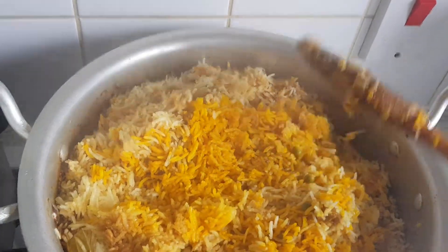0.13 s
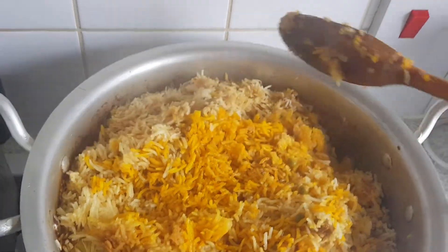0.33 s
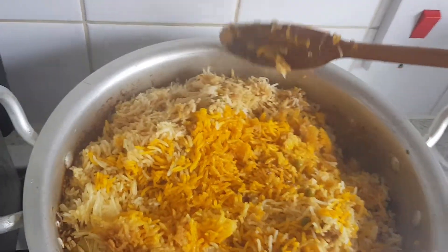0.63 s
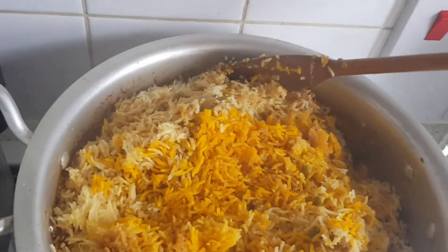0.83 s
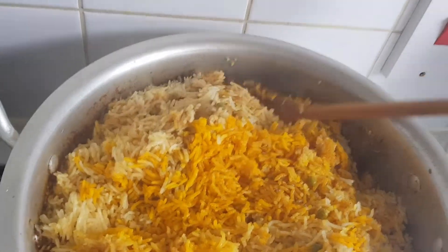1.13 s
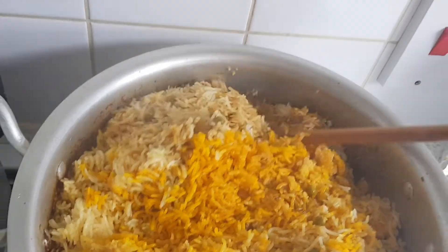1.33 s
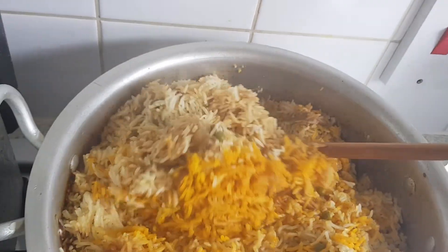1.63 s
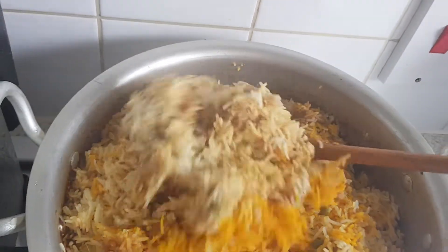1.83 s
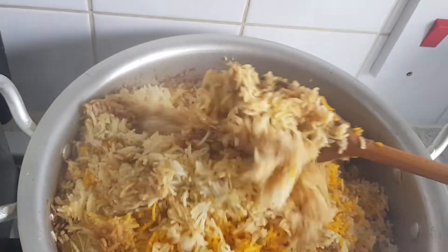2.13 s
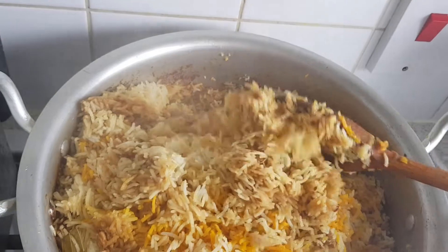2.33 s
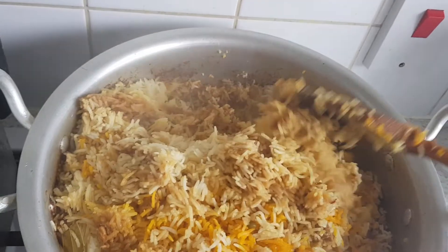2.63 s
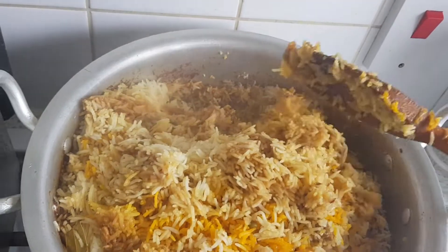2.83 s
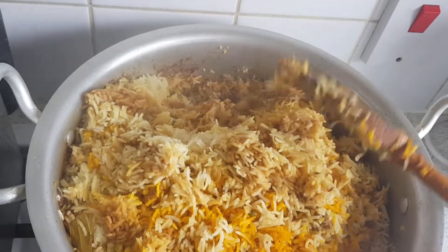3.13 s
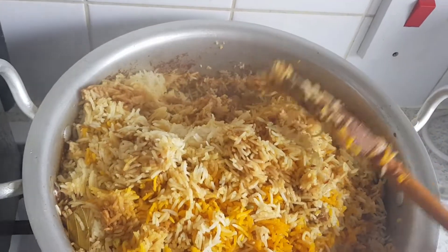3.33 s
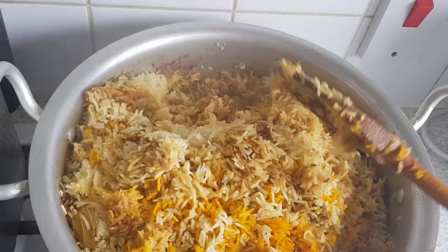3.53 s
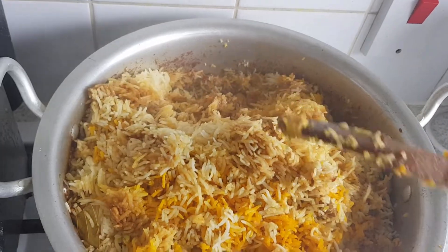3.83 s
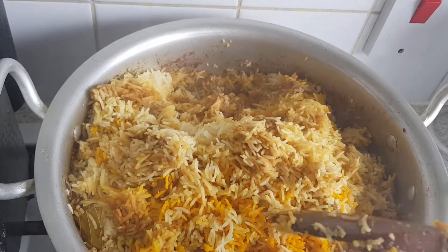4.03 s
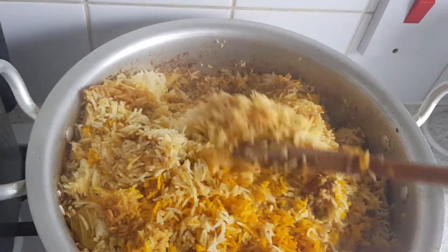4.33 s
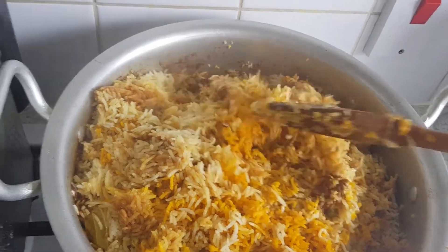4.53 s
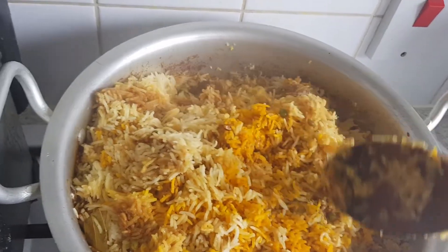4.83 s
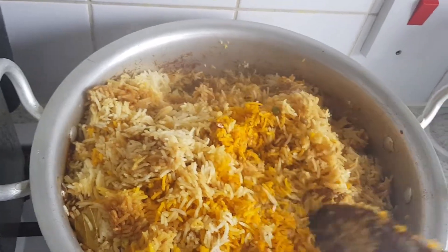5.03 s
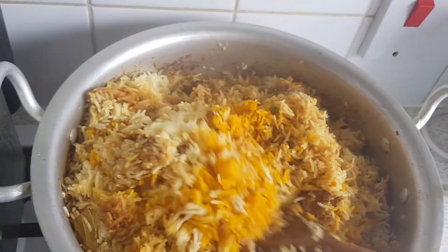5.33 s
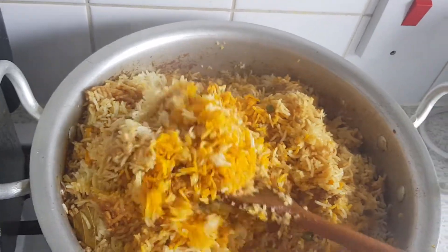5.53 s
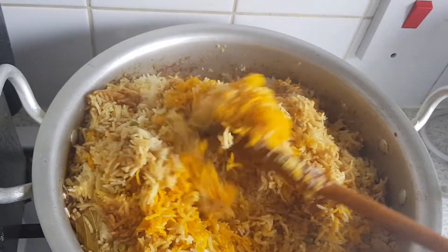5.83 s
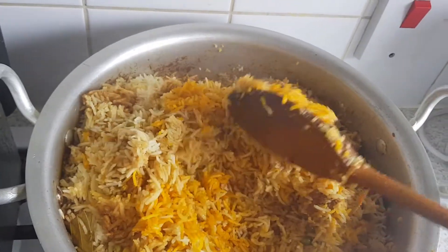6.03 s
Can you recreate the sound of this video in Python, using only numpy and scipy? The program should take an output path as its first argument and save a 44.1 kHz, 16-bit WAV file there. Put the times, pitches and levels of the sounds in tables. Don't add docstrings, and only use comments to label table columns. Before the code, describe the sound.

A phone held close in a small tiled kitchen hears steady soft hiss, swelling low rumble and a faint thin whine. Almost at once, at 0.04 s, a wooden spoon cracks hard on a metal pot rim, a short clanky ring damped by rice, with a late stove thud. After near quiet, from 0.9 to 1.2 s the edge catches, chatters and scrapes down the wall, bright and raspy, then duller, ending in a soft landing. From 1.3 to 2.1 s there are faint low rubs on the bottom; from 1.7 to 3 s, tiny crisp rice ticks, soft lumps dropping around 2.2 to 2.35, and a muffled knock at 2.5. Two rim taps ring at 3.3 and 3.5 s, the second firmer. Only faint grain fizz follows until a dull double bump at 5.0 and a low wall knock at 5.2, then rice ticks and barely audible dry brushes to about 6 s.

```python
import sys
import numpy as np
from scipy import signal
from scipy.fft import rfft, irfft, next_fast_len
from scipy.io import wavfile
from scipy.ndimage import uniform_filter1d

SR = 44100
rng = np.random.default_rng(int(sys.argv[2]) if len(sys.argv) > 2 else 0)


def level_to_linear(level):
    exponent = np.asarray(level, float) / 20
    return 10 ** exponent


def to_wav(s):
    ch = np.atleast_2d(s).T
    pcm = np.round(np.clip(ch, -1, 1) * 32767)
    wavfile.write(sys.argv[1], SR, pcm.astype(np.int16))


N = 273081
FAST = next_fast_len(N)
LEFT_LAG_S = 4.3 / SR

# pitch_hz, level_db, t60_s
GRATE_MODES = [(47, -17, 0.4), (78.2, -8, 0.59), (92.5, -3.5, 0.26), (107.5, 5, 0.12), (128.8, 0, 0.35),
               (151, -15, 0.4)]


def on_log(table, hz):
    f, v = np.transpose(table)
    return np.interp(np.log(np.maximum(hz, 1)), np.log(f), v)


def colour(x, table):
    size = next_fast_len(x.shape[-1])
    gain = level_to_linear(on_log(table, np.fft.rfftfreq(size, 1 / SR)))
    return irfft(rfft(x, size) * gain, size)[..., :x.shape[-1]]


def band(x, low_hz, high_hz):
    return signal.sosfilt(signal.butter(2, [low_hz, high_hz], "band", fs=SR, output="sos"), x)


def unit(x):
    return x / np.sqrt(np.mean(x ** 2))


def curves(table):
    return np.interp(np.arange(N) / SR, *np.transpose(table), -300, -300)


def walk(rate_hz):
    k = int(SR / rate_hz)
    steps = np.repeat(rng.standard_normal(N // k + 1), k)
    return uniform_filter1d(uniform_filter1d(steps, k), k)[:N]


def ring(modes):
    t = np.arange(SR // 3) / SR
    return sum(level_to_linear(db) * np.sin(2 * np.pi * hz * t) * np.exp(-np.log(1000) * t / max(t60_s, 1 / 200))
               for hz, db, t60_s in modes)


def resonate(x, peaks):
    modes = [(hz, db + 10 * np.log10(width_hz), np.log(1000) / (np.pi * width_hz)) for hz, width_hz, db in peaks]
    return unit(signal.fftconvolve(x, ring(modes))[:N])


def add(out, s, x, db):
    i = int(s * SR)
    out[i:i + len(x)] += (x * level_to_linear(db) / np.max(np.abs(x)))[:N - i]


def grains(rate_hz, spread_db):
    biggest_spreads = 3.5
    chance = rng.random((3, N))
    clicks = (chance[0] < rate_hz / SR) * np.sign(chance[1] - .5)
    size_db = spread_db * np.minimum(-np.log(1 - chance[2]), biggest_spreads)
    return unit(clicks * level_to_linear(size_db))


def push(s, length_s, db):
    edge_share = 0.27
    t = np.arange(N) / SR - s
    rise = np.clip(np.minimum(t, length_s - t) / (length_s * edge_share / 2), 0, 1)
    return level_to_linear(db) * rise ** 2, np.clip(t, 0, length_s) - length_s / 2


def blows():
    # spoon_db, crack_db, thud_db
    hard_rim = [
        (.043, -11.5, 0.44, 6.3, -5),
    ]
    rim = [
        (3.321, -23, 2.8, -1.5, 0),
        (3.4725, -18, 3.4, 2.5, 0),
    ]
    wall = [
        (4.977, -24.5, -12.5, -42, -12.5),
        (4.994, -30, -20, -42, -18),
    ]
    low_wall = [
        (5.203, -25.5, 0.81, -8, -8.5),
    ]
    landing = [
        (1.181, -19.5, -14, -6.5, -9.5),
    ]
    catch = [
        (.888, -28, -2, 3.5, -6),
        (.9197, -29.5, -1, -4, -5),
        (.945, -28, -5, -10, -14),
        (.996, -36, 3, 11.5, 4),
        (1.038, -42, 13, 8, -5),
        (1.082, -46, 3, 4, -20),
        (1.137, -44, 0, -9.5, -22),
    ]
    buried = [
        (2.477, -34, -12, -33, -1),
    ]
    # pitch_hz, level_db, t60_s
    hard_rim_modes = [(256, -3, 0.19), (374, -6, 0.14), (472, -5.5, 0.12), (572, -11, 0.16),
                      (669, -3.5, 0.068), (785, -12, 0.091), (844, -1.5, .14), (905, 1, 0.083),
                      (957, 17, 0.023), (966, -7, 0.057), (1088, 4, 0.077), (1143, -11, 0.064),
                      (1342, -12.5, 0.11)]
    rim_modes = [(284, -6.5, 0.12), (338.3, -6.5, 0.22), (435, -13, 0.18), (617, 2, 0.081), (670, 0, 0.11),
                 (716, 6, 0.073), (792, 1, 0.097), (840, 4, 0.15), (908, 20.5, 0.043), (952, 11, 0.029),
                 (1085, -6, 0.1), (1339, 3.5, 0.086)]
    wall_modes = [(256, -8.5, 0.19), (329, -7, 0.075), (388, -11, 0.11), (433, -9, 0.092),
                  (575, -5.5, 0.093), (630, 2, 0.11), (659, -7.5, 0.11), (840, -6, 0.095),
                  (1343, -13, .045)]
    low_wall_modes = [(249, -9.5, 0.22), (332, -14.5, 0.14), (630, -2.5, 0.14), (702, -7, 0.13),
                      (840, -2, 0.15), (1060, -16, 0.059), (1290, -20, 0.11), (1560, -20, 0.073)]
    landing_modes = [(327, -4, 0.06), (486, -3, 0.08), (588, 0, 0.063), (648, -2.5, 0.072),
                     (827, -12.5, 0.085), (1364, 8, 0.027)]
    catch_modes = [(337, -16, 0.14), (475, -5, 0.13), (542, 23, 0.021), (570, 0, 0.12), (710, -2, 0.037),
                   (817, 9, 0.12), (810, -25, 0.26), (1320, -9, 0.035)]
    buried_modes = [(324, -18, 0.075), (505, -10, 0.063), (569, -6.5, 0.15), (636, 2, 0.062),
                    (847, -7.5, 0.094)]
    # pitch_hz, level_db, t60_s
    spoon_modes = [(326, -10.5, 0.13), (953, 14.5, 0.019), (1299, -3.5, 0.062), (2020, -10.5, 0.035)]
    bright_modes = [(1790, -8, 0.16), (1857, -5, 0.18), (2140, -3, 0.17), (2410, -4, 0.12),
                    (2820, -6, 0.15), (2880, 0, 0.2), (3060, -13, 0.055), (3360, -10, 0.097),
                    (3900, -8, 0.1), (4500, 0, .1), (5060, -9, 0.13), (6100, -13, 0.062),
                    (6420, -7.5, 0.082), (7740, -5, 0.079)]
    jump_modes = [(49.4, -21, .4), (76.3, -7, 0.27), (100, -4.5, 0.15), (121, -6, 0.23), (149.3, -2, 0.18)]
    # pitch_hz, level_db_per_hz
    shell_colour = [(150, -2.5), (260, 0.5), (500, 6), (900, 0), (1300, -13), (1800, -0.5), (3000, -76)]
    crack_colour = [(710, -75), (1200, 2), (1830, -5.5), (2880, 2.5), (3490, -4.5), (4200, 1.5),
                    (6170, -6.5), (15000, -31.5)]
    twin_spread, twin_db = .025, -5
    soft_top_hz, hard_db, hard_octaves_per_db = 9200, -6.5, 3
    shudder_s, shudder_db = 0.038, -9

    out, t = np.zeros(N), np.arange(SR // 3) / SR
    spoon = ring(spoon_modes)
    bright = sum(ring([(hz * split, db, t60_s) for hz, db, t60_s in bright_modes]) for split in (.991, 1, 1.013))
    crack_env = np.minimum(t / 0.002, 1) * (np.exp(-t / 0.0069) + level_to_linear(-47.0) * np.exp(-t / 0.013))
    # rows, modes, shell_db, build_ms
    places = ((hard_rim, hard_rim_modes, -3, 3.1), (rim, rim_modes, -8, 6.5), (wall, wall_modes, -14, 7.5),
              (low_wall, low_wall_modes, -12, 5.), (landing, landing_modes, -6, 10),
              (catch, catch_modes, -5, 3.5), (buried, buried_modes, -6, 11.6))
    for rows, modes, shell_db, build_ms in places:
        stove = band(ring(jump_modes if rows is hard_rim else GRATE_MODES), 45, 400)
        build = 1 - np.exp(-t * 1000 / build_ms)
        for s, db, spoon_db, bright_db, thud_db in rows:
            noise = rng.standard_normal((4, len(t)))
            detune = 1 + twin_spread * rng.uniform(-1.1, 1, len(modes))
            twins = [(hz * k, d + twin_db, t60_s) for (hz, d, t60_s), k in zip(modes, detune)]
            add(out, s, (ring(modes) + ring(twins)) * build ** 2, db)
            add(out, s, spoon * np.minimum(t / 0.0012, 1), db + spoon_db)

            top_hz = np.clip(soft_top_hz * 2 ** (hard_octaves_per_db * (bright_db - hard_db)), 1100, 20000)
            shell = band(colour(noise[0], shell_colour), 65, top_hz)
            add(out, s, shell * build * np.exp(-t / 0.022), db + shell_db)
            crack = band(colour(noise[1], crack_colour) * crack_env, 200, top_hz)
            add(out, s, crack, db + bright_db)
            strike = (noise[2] * np.exp(-t / 0.0012))[:SR // 20]
            add(out, s, signal.fftconvolve(bright, strike), db + bright_db - 7.0)

            add(out, s + 0.0045, signal.fftconvolve(stove, np.hanning(SR // 120)), db + thud_db)
            shudder = signal.fftconvolve(stove, noise[3] * np.exp(-t / shudder_s))
            add(out, s + 0.02013, shudder, db + thud_db + shudder_db)
    return out


def scrape():
    # time_s, level_db
    pressure = [
        [(0.888, -26.5), (0.914, -37.5), (.922, -38), (.94, -47), (.948, -34.5), (0.965, -37), (0.982, -43),
         (0.992, -32)],
        [(0.992, -35), (1.02, -36.5), (1.034, -39), (1.056, -30.5), (1.082, -32.5), (1.1, -45), (1.13, -47),
         (1.152, -37), (1.178, -50), (1.3, -65.5)],
    ]
    # middle_ring_db, high_ring_db, rasp_db, stove_db
    mixes = [
        (2.5, -4.5, -8.5, -8.5),
        (-0.5, -10.5, -18, -5),
    ]
    # pitch_hz, width_hz, level_db
    low_wall_peaks = [
        [(373, 13, -3), (482.4, 31, 9), (540, 28, 8), (570, 30, -4), (635, 40, 4)],
        [(335, 17, -7.5), (483, 25, -5), (510.4, 12, 9), (570, 16, -10), (628, 25, -3)],
    ]
    middle_wall_peaks = [
        [(815, 35, -9), (840, 27, 7.5), (890, 32, -14), (1080, 35, -25), (1248, 16, 8.5), (1290, 27, -23)],
        [(795, 16, 7), (835, 32, 3.5), (889, 17, 3), (1057, 30, 2), (1149, 21, -1), (1370, 61, -16)],
    ]
    # pitch_hz, width_hz, level_db
    high_peaks = [(1750, 82, -3), (1880, 53, -0.5), (2128, 62, 1.5), (2400, 97, 0), (2950, 130, -2.5),
                  (2830, 40, -22), (3360, 41, -10), (3720, 30, -9), (4060, 11, -5)]
    rasp_peaks = [(4630, 130, -1), (5010, 100, -2.5), (5900, 100, -2), (6350, 90, -4), (7690, 120, -6),
                  (8400, 120, -5), (9500, 150, -6), (10300, 150, -5), (10900, 160, -6), (11900, 150, -7),
                  (12500, 150, -6), (13300, 150, -8), (14200, 150, -10)]
    brush_peaks = [(4100, 300, -3), (4900, 140, 2), (5600, 300, -6), (6480, 140, -1), (7900, 300, -6)]
    follow = (.5, .25, .3)
    # start_s, peak_db
    chatter = [(0.9203, -39), (0.947, -44), (0.997, -19.5), (1.007, -26), (1.022, -29), (1.0395, -25),
               (1.047, -29), (1.064, -29), (1.0815, -27), (1.098, -40), (1.117, -36), (1.13, -48),
               (1.195, -46)]
    # pitch_hz, level_db, t60_s
    chatter_modes = [(1564, 4, .035), (1770, 2, 0.035), (2163, 2, 0.041), (2420, -9, .03), (2890, 1, 0.042),
                     (3400, -4, 0.04)]
    # start_s, length_s, high_ring_db, rasp_minus_ring_db
    brushes = [
        (0.724, 0.078, -75, 12),
        (1.323, 0.15, -57.5, -1.5),
        (5.255, 0.15, -71.5, 13.5),
        (5.397, .06, -76, 14),
        (5.48, .07, -76.5, 14),
        (5.545, 0.096, -74.5, 14.5),
    ]
    press_db = -36

    slips = grains(900, 3.0)
    grit = grains(5000, 3.)
    skips = level_to_linear(np.clip(4.5 * walk(90), -7, 2))
    high = resonate(grains(1400, 2.5) * skips, high_peaks)
    wide = unit(band(grit, 4300, 19000))
    rasp = resonate(grit, rasp_peaks) + 0.68 * wide + 0.29 * unit(band(grit, 9800, 21000))
    rasp = unit(rasp) * np.sqrt(skips)
    stove = unit(signal.fftconvolve(rng.standard_normal(N), ring(GRATE_MODES))[:N])

    out = np.zeros(N)
    for part, (*mix_db, stove_db), low, middle in zip(pressure, mixes, low_wall_peaks, middle_wall_peaks):
        db = curves(part)
        gain = level_to_linear(db)
        change_db = np.clip(db - press_db, -12, 12)
        middle_db, high_db, rasp_db = (m + (share - 1) * change_db for m, share in zip(mix_db, follow))
        wall = resonate(slips, low) + level_to_linear(middle_db) * resonate(slips[::-1], middle)
        out += gain * (wall + level_to_linear(high_db) * high + level_to_linear(rasp_db) * rasp)
        out += uniform_filter1d(gain, SR // 20) * level_to_linear(stove_db) * stove

    for s, db in chatter:
        kick = rng.standard_normal(SR // 200) * np.hanning(SR // 200)
        luck = rng.standard_normal(len(chatter_modes))
        woken = [(hz, d + 4. * k, t60_s) for (hz, d, t60_s), k in zip(chatter_modes, luck)]
        add(out, s, signal.fftconvolve(kick, ring(woken)), db)

    brush = unit(resonate(grit, brush_peaks) + 1.07 * wide)
    for s, length_s, db, rasp_db in brushes:
        out += push(s, length_s, db)[0] * (high + level_to_linear(rasp_db) * brush)
    return out


def rub():
    # start_s, length_s, level_db, floor_mode_hz
    pushes = [(0.4, .3, -71.5, 538), (0.715, 0.091, -60, 570), (0.845, 0.05, -49.5, 813),
              (1.292, .06, -61, 574), (1.366, 0.035, -53.5, 670), (1.397, 0.081, -56.5, 635),
              (1.475, 0.037, -48.5, 670), (1.537, 0.16, -58.5, 621), (1.64, .12, -67, 833),
              (1.676, 0.096, -64.5, 650), (1.762, 0.031, -58, 590), (1.8, 0.17, -67, 630),
              (1.964, 0.026, -57, 620), (2.01, 0.048, -62, 840), (2.035, 0.031, -61, 583),
              (1.967, .11, -65, 685), (5.608, 0.063, -64, 647)]
    # pitch_hz, width_hz, level_db
    answer_peaks = [(875, 13, 6), (329.6, 6.2, 6), (547, 18, 13)]
    floor_width_hz, sag_hz_per_s, wall_answer_db = 24, 200, -10

    slips = grains(600, 1.9) + 1j * grains(714, 2.3)
    flutter = signal.lfilter([1], [1, -np.exp(-np.pi * floor_width_hz / SR)], slips)
    flutter = np.sqrt(2) * flutter / np.sqrt(np.mean(np.abs(flutter) ** 2))
    wall = level_to_linear(wall_answer_db) * resonate(slips.real, answer_peaks)
    out = np.zeros(N)
    for s, length_s, db, hz in pushes:
        gain, t = push(s, length_s, db)
        on = gain > 0
        turns = (hz - sag_hz_per_s * t[on] / 2) * t[on]
        floor = np.real(flutter[on] * np.exp(2j * np.pi * turns))
        out[on] += gain[on] * (floor + wall[on])
    return out


def rice():
    # start_s, peak_db, pitch_hz
    ticks = [(.742, -53, 7000), (.793, -49, 11500), (1.748, -43.5, 7660), (1.794, -43.5, 11100),
             (1.8947, -45, 10400), (1.98, -44, 6030), (2.1435, -52, 8100), (2.163, -40.5, 8580),
             (2.193, -43, 7700), (2.2124, -44, 10100), (2.219, -49, 8540), (2.2747, -50, 7820),
             (2.295, -44, 11000), (2.303, -51, 7870), (2.38, -55, 10300), (2.4464, -60, 6100),
             (2.509, -58, 5800), (2.6636, -44, 10500), (2.7931, -48, 12400), (2.9485, -36, 4800),
             (5.114, -44.5, 11000), (5.1522, -50, 9900), (5.19, -45, 10500), (5.205, -38, 3300),
             (5.217, -47, 10000), (5.432, -43, 4500), (5.669, -50, 9300), (5.684, -50, 8500),
             (5.312, -41, 11000), (5.472, -45, 11500), (5.6127, -41, 11600)]
    # start_s, low_peak_db, middle_minus_low_db, upper_minus_low_db
    lumps = [
        (2.176, -56.5, 3, 9),
        (2.236, -47.5, 7.5, -15),
        (2.276, -44.5, 0, 8.5),
        (2.346, -45, -10, -2),
    ]
    # pitch_hz, level_db, t60_s
    lump_modes = [
        [(318, 1, 0.044), (190, -9, 0.033)],
        [(566, 6, 0.028), (670, -4, 0.033), (890, -10, .03)],
        [(1225, 3, 0.021), (1470, 1, 0.021)],
    ]

    out, t = np.zeros(N), np.arange(SR // 50) / SR
    for s, db, hz in ticks:
        ping = np.sin(2 * np.pi * hz * t) * np.exp(-t / 0.00052)
        spray = band(rng.standard_normal(len(t)), 0.61 * hz, min(2.0 * hz, 16000)) * np.exp(-t / 0.0039)
        add(out, s, ping + 0.49 * spray, db)
    for s, db, *above_db in lumps:
        for modes, more_db in zip(lump_modes, (0, *above_db)):
            add(out, s, ring(modes), db + more_db)
    return out


def bed():
    # time_s, level_db
    stir = [(0, -52), (.26, -100), (.72, -83), (.878, -49), (.892, -50), (1.05, -41.5), (1.15, -54),
            (1.41, -55), (2.2, -64), (2.5, -54), (3.3, -62), (3.52, -54), (4, -52.5), (4.3, -57.5),
            (5.2, -54.5), (5.43, -54.5), (5.7, -59.5), (6.19, -62.5)]
    # pitch_hz, level_db_per_hz
    rice_colour = [(2500, 3.5), (4500, 3), (7000, -1.5), (10000, 1.5), (13000, 2), (15500, -1)]
    heap_db, average_stir_db, heap_db_per_stir_db = -73, -57, 2.
    fizz_flicker_db = 1.2

    stir_db = curves(stir)
    clicks = np.array([grains(6000, 5.6), grains(7800, 3.8)])
    fizz = unit(colour(clicks + 0.012 * clicks[::-1], rice_colour))
    fizz = fizz * level_to_linear(stir_db) * level_to_linear(fizz_flicker_db * walk(25.1))
    murmur = unit(band(band(rng.standard_normal(N), 400, 1050), 350, 1130))
    level_db = heap_db + heap_db_per_stir_db * np.minimum(stir_db - average_stir_db, 8)
    heap = murmur * level_to_linear(level_db) * level_to_linear(0.5 * walk(21.3))
    return fizz * level_to_linear(np.array([[-1.5], [-4.5]])) + heap * level_to_linear(np.array([[.8], [-.8]]))


def ports(x):
    # pitch_hz, left_minus_right_db
    pot_balance = [(60, 3), (150, 3), (300, 0), (600, 4), (1200, 3), (2400, 4.5), (4500, 10), (8500, 12.5),
                   (14000, 4)]
    hz = np.fft.rfftfreq(FAST, 1 / SR)
    half = level_to_linear(on_log(pot_balance, hz) / 2)
    paths = np.array([half * np.exp(-2j * np.pi * hz * LEFT_LAG_S), 1 / half])
    return irfft(rfft(x, FAST) * paths, FAST)[:, :N]


def room(x):
    low_t60_s, low_db = 0.23, -18.5
    top_t60_s, top_db = 0.26, -10
    t = np.arange(SR // 3) / SR
    onset = np.clip(t / 0.0024 - .3, 0, 1)
    noise = rng.standard_normal((2, 2, len(t))) * onset / np.sqrt(SR / 50)
    low = band(noise[0], 164, 1600)
    top = signal.sosfilt(signal.butter(1, 1200, "high", fs=SR, output="sos"), noise[1])
    tail = level_to_linear(low_db + 11.5) * low * 1000. ** (-t / low_t60_s)
    tail = tail + level_to_linear(top_db) * top * 1000. ** (-t / top_t60_s)
    return signal.fftconvolve(x[None], tail, axes=1)[:, :N]


def kitchen():
    # pitch_hz, level_db_per_hz
    air_colour = [(15, -28), (25, -8), (55, 1.5), (97, -8), (134, -4), (212, -31), (285, -23.5), (416, -30),
                  (962, -13.5), (2280, -20), (2480, -22), (3080, -26), (6210, -28.5), (11300, -26.5),
                  (16000, -37)]
    # pitch_hz, share
    likeness = [(60, 0.96), (300, 0.93), (1000, 0.36), (4000, 0.14), (12000, 0.026)]
    # pitch_hz, left_minus_right_db
    air_balance = [(60, 1), (110, 3.5), (200, 4), (380, 0.5), (700, 3.5), (1290, 2.5), (2380, 5.5),
                   (4400, 7), (8120, 8), (15000, 7)]
    # pitch_hz, level_db
    whine_tones = [(186, -77), (2395, -73)]
    air_db, swell_db, swells_per_s = -56, -3.5, 2.22

    hz = np.fft.rfftfreq(FAST, 1 / SR)
    share = np.clip(on_log(likeness, hz), 0, 1)
    common, left, right = rfft(rng.standard_normal((3, N)), FAST)
    lag = np.exp(-2j * np.pi * hz * LEFT_LAG_S * np.array([[1], [0]]))
    both = np.sqrt(share) * common * lag + np.sqrt(1 - share) * np.array([left, right])
    lean = level_to_linear(on_log(air_balance, hz) / 2 * np.array([[1], [-1]]))
    air = irfft(both * lean * level_to_linear(on_log(air_colour, hz)), FAST)[:, :N]
    air = air * level_to_linear(air_db) / np.sqrt(np.mean(air.mean(axis=0) ** 2))
    bass = signal.sosfiltfilt(signal.butter(3, 190, fs=SR, output="sos"), air)
    hiss = (air - bass) * level_to_linear(.8 * walk(4))
    rumble = bass * level_to_linear(swell_db * walk(swells_per_s) + 0.25 * walk(2.0))
    t = np.arange(N) / SR
    whine = sum(np.sqrt(2) * level_to_linear(db) * np.sin(2 * np.pi * f * t + 1.8 * walk(13)) for f, db in whine_tones)
    return hiss + rumble + whine


def scene():
    pot = blows() + scrape() + rub() + rice()
    return ports(pot) + room(pot) + bed() + kitchen()


def roll_off(x):
    return signal.sosfilt(signal.butter(12, 15840, fs=SR, output="sos"), x)


def record(dry):
    ceiling, top_hz = .84, 15830
    x = signal.sosfilt(signal.butter(5, 40, "high", fs=SR, output="sos"), dry)
    x = x / (1 + (x / ceiling) ** 4) ** (1 / 4)
    x = signal.sosfilt(signal.ellip(10, .2, 80, top_hz, fs=SR, output="sos"), x)
    return roll_off(x)


dry = scene()
out = record(dry)
to_wav(out)
```